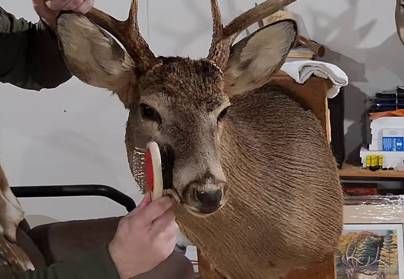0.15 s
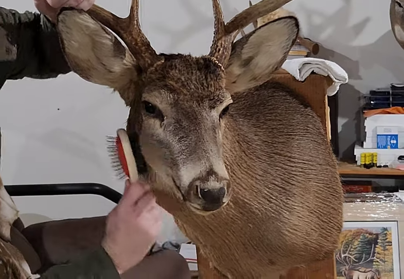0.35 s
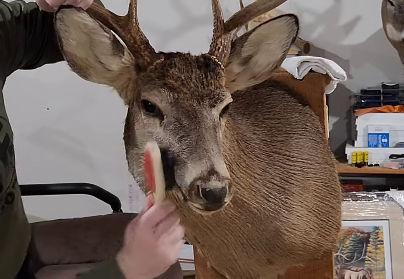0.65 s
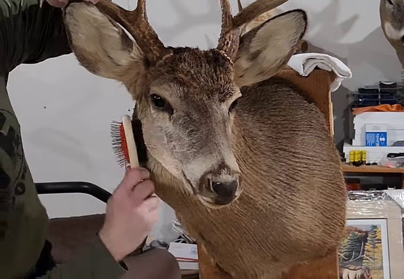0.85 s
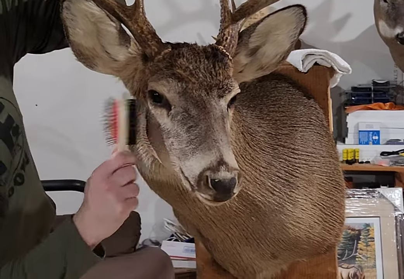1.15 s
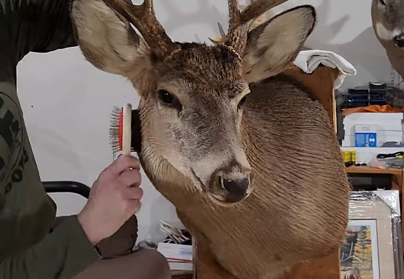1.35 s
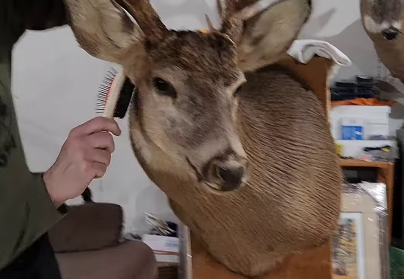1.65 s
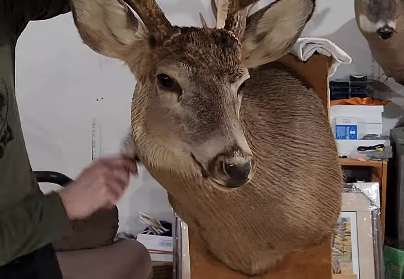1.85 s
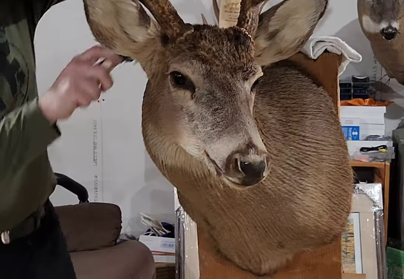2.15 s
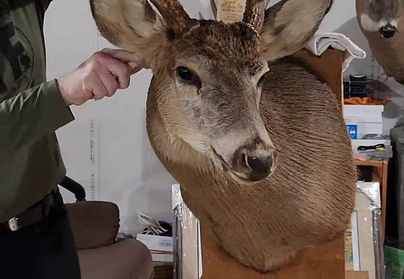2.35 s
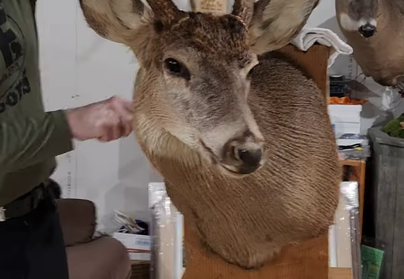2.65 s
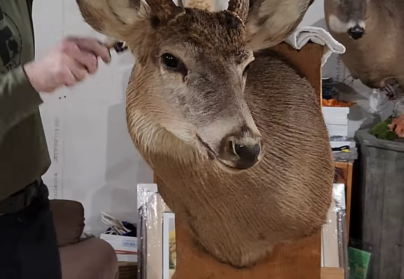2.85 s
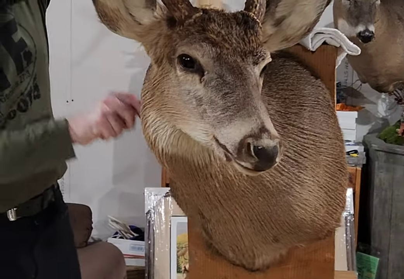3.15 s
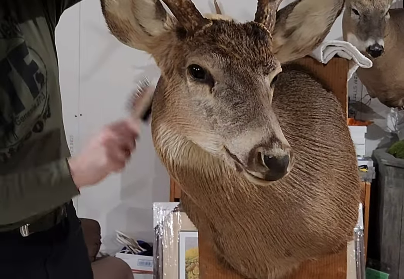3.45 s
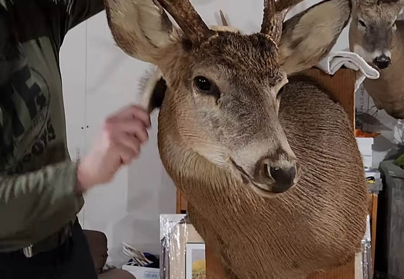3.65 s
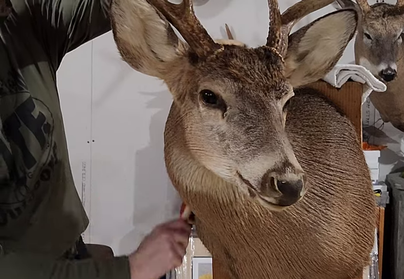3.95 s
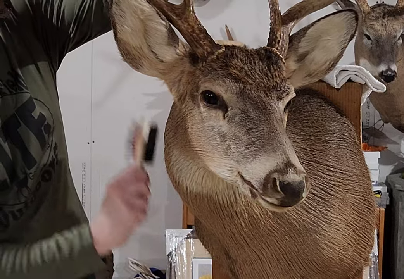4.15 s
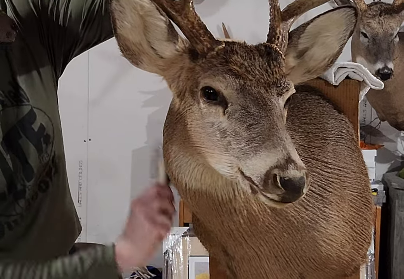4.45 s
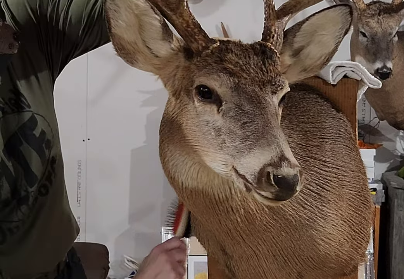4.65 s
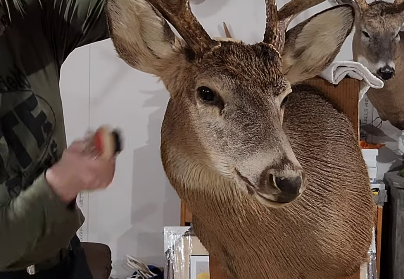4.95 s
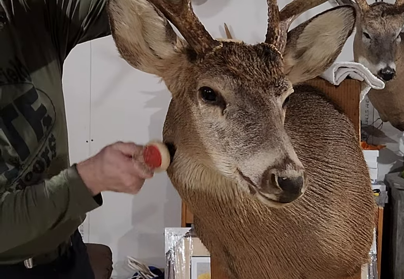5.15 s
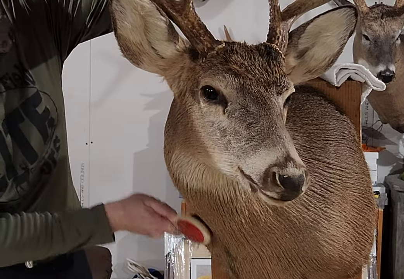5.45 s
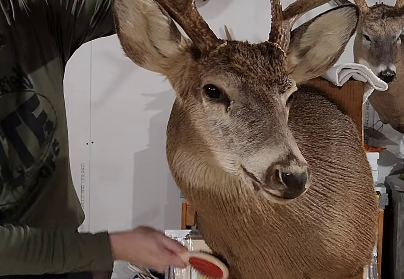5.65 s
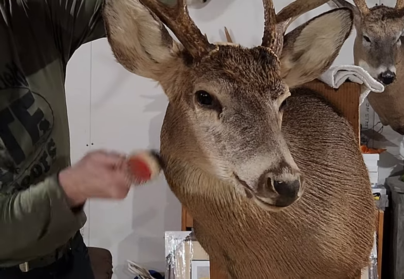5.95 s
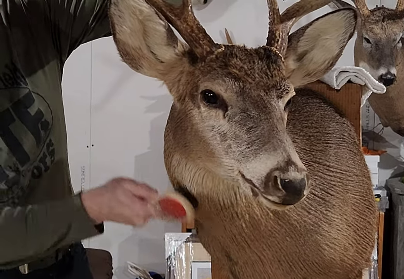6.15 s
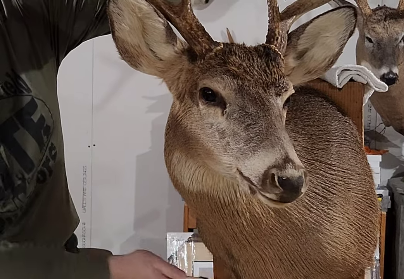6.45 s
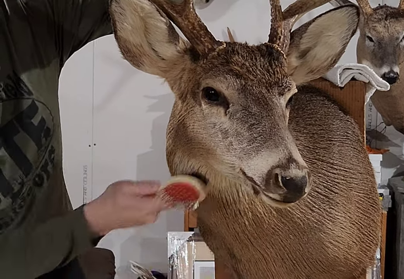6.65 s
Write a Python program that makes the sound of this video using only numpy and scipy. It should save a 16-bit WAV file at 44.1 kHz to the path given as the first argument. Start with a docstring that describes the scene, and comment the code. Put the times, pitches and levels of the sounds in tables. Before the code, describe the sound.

Stiff bristles rasp through the dry coat of a mounted deer head, heard closely in stereo. Brief scratchy strokes with bright hair hiss alternate with short gaps; the brush sometimes pats the hollow form with a muffled thump. One sharp knock of wood on wood, much louder than everything else, comes near the middle with a short dull tail. More strokes follow, some sinking in tone, over quiet humming indoor air.

```python
"""Brushing a mounted deer head

A wooden grooming brush, close to a two-port microphone in a small room, strokes the hair of the head.
Random bristle flicks, shaped stroke by stroke, make the rub, scrape and hiss; decaying modes make the
soft thumps of the hollow form and one hard clack on wood, with a small bounce and a dull noisy tail.
Behind them steady sine tones hum, two of them beating faintly, over dull, noisy room air."""
import sys
import numpy as np
from scipy import signal
from scipy.fft import rfft, irfft
from scipy.io import wavfile
from scipy.ndimage import uniform_filter1d

SR = 44100
rng = np.random.default_rng(int(sys.argv[2]) if len(sys.argv) > 2 else 0)


def pcm_store(signal):
    """Save signal as 16-bit PCM."""
    levels = np.round(np.clip(np.atleast_2d(signal), -1, 1) * 32767)
    wavfile.write(sys.argv[1], SR, levels.astype(np.int16).T)


N = 299439
T = np.arange(N) / SR  # time in seconds
FREQS = np.fft.rfftfreq(2 * N, 1 / SR)  # Hz

# Colour of the bristle shafts scraping over hair, heard close. Each row: frequency in Hz, level in dB.
SCRAPE_COLOUR = [(900, -6), (1800, -3.5), (2500, -6.5), (2950, 0), (3300, -2), (3600, -1), (4000, -2),
                 (4700, -1.5), (5600, -9), (7500, -24.5), (11000, -23.5)]
# Duller colour of the rubbed coat, also lent to the clack's tail. Each row: frequency in Hz, level in dB.
RUB_COLOUR = [(250, -24), (520, -9), (680, 0), (820, -1), (1000, -3), (1400, 0.5), (1800, -4), (2100, -1),
              (2500, -6.5), (4500, -30.5)]
# Bright hiss of the hair tips, heard close. Each row: frequency in Hz, level in dB.
TIPS_COLOUR = [(3500, -14.5), (6000, -3), (7600, -0.5), (9300, -4), (10700, -10.5), (12000, -1),
               (15500, -2.5)]


def brushing():
    """Each stroke rubs the coat, scrapes and hisses; the grip of the bristles wavers as they go."""
    scrape, rub, tips = stroking()
    grip = undb(0.97 * walk(45))
    coat = rub * flicks(RUB_COLOUR, rate=1700, scatter_db=1, width=1.06, pan_db=-0.75) * undb(0.62)
    shafts = scrape * flicks(SCRAPE_COLOUR, rate=5000, scatter_db=2, width=1.3, pan_db=-2.5) * undb(3.0)
    hiss = tips * flicks(TIPS_COLOUR, rate=10000, scatter_db=2.0, width=3.1, pan_db=4) * undb(4)
    return glance(grip * (coat + shafts + hiss), lag_s=.0022, share=0.86) + neck()


# Strokes of the brush through the coat. Each row: start in seconds, length in seconds, relative levels
# of scrape, rub and hair tips in dB, growth of pressure over the stroke in dB.
BRUSH_STROKES = [(-.1, .14, -56.5, -51.5, -63, 2.5), (0.012, 0.28, -63, -56, -69.5, 3),
                 (0.186, 0.25, -50.5, -55, -53.5, 5.5), (.44, 0.29, -74, -67, -80, 0),
                 (0.655, 0.21, -54, -55, -53, 3), (0.783, 0.21, -47, -49, -54, -3),
                 (1.217, .228, -47.5, -49, -53.5, 7), (1.7, 0.16, -49.5, -54.5, -55, 6),
                 (1.99, 0.3, -66, -56.5, -72, 19.5), (2.266, 0.42, -57.5, -54.5, -64, 13),
                 (2.962, 0.38, -56, -51, -63, 19), (3.653, 0.32, -54, -54, -60.5, 2),
                 (4.312, 0.34, -53.5, -54, -60, 1), (5.078, 0.43, -52.5, -51, -61, 0.5),
                 (5.497, 0.17, -56.5, -52.5, -61, 12), (6.03, 0.23, -51.5, -52.5, -56.5, 2),
                 (6.229, .17, -54.5, -49, -58.5, 12), (6.69, 0.26, -48, -56, -56, 5)]
# Faint rustle of coat and sleeve under the strokes. One row: relative levels of scrape, rub, tips in dB.
RUSTLE_LEVELS = (-80, -72, -84)
SINK_DB = 4.5  # the bristles sink into the coat as they travel, so its rub grows more over each stroke


def stroking():
    """Gains of scrape, rub and tips through all the strokes, added as powers over the rustle."""
    power = np.outer(undb(RUSTLE_LEVELS) ** 2, np.ones(N))
    for start, length, scrape_db, rub_db, tips_db, growth_db in BRUSH_STROKES:
        press = pressure(start, length, growth_db)
        sinking_press = pressure(start, length, growth_db + SINK_DB)
        power[0] += (undb(scrape_db) * press) ** 2
        power[1] += (undb(rub_db) * sinking_press) ** 2
        power[2] += (undb(tips_db) * press) ** 2
    return np.sqrt(power)


ATTACK_S, ARCH_DB, RELEASE_DB_PER_S = 0.081, 3, 258


def pressure(start, length, growth_db):
    """Gain of one stroke: a quick bite, an arched hold that grows or eases, and a release."""
    t = T - start
    way = np.clip(t / length, 0, 1)
    hold_db = growth_db * (way - .5) - ARCH_DB * (2 * way - 1) ** 2
    release_db = RELEASE_DB_PER_S * np.clip(t - length, 0, 1)
    bite = np.sin(np.pi / 2 * np.clip(t / ATTACK_S, 0, 1)) ** 2
    return bite * undb(hold_db - release_db)


def flicks(points, rate, scatter_db, width, pan_db):
    """Dense coloured clicks at random moments (rate per second), like bristles snapping past hairs."""
    happens = rng.random((3, N)) < rate / SR
    strength = rng.standard_normal((3, N)) * undb(scatter_db * rng.standard_normal((3, N)))
    return spread(colour(happens * strength, points), width, pan_db)


def glance(x, lag_s, share):
    """An echo off the deer's head, whose delay drifts at random so that the colour shifts."""
    late = [np.interp(T - lag_s * (1 + .2 * walk(3)), T, side) for side in x]
    return (x + share * np.array(late)) / np.sqrt(1 + share ** 2)


# Strokes down the neck that make the hollow form murmur. Each row: start in seconds, length in seconds,
# first centre in Hz, last centre in Hz, level in dB, growth in dB.
NECK_STROKES = [(5.3, 0.21, 1190, 1023, -52.5, 9), (5.62, .24, 690, 580, -59.5, 4),
                (6.23, .19, 740, 550, -61.5, 13)]


def neck():
    """Bristles dragging down the neck excite a broad resonance that sinks towards the chest."""
    lowpass = signal.butter(2, 210, fs=SR, output="sos")
    noise = rng.standard_normal((3, N)) + 1j * rng.standard_normal((3, N))
    drag = signal.sosfilt(lowpass, noise)
    out = 0
    for start, length, first_hz, last_hz, db, growth_db in NECK_STROKES:
        centre_hz = np.interp(T, [start, start + length], [first_hz, last_hz])
        # turning the complex noise moves its band up to the gliding centre
        turn = np.exp(2j * np.pi * np.cumsum(centre_hz) / SR)
        murmur = spread((drag * turn).real, width=0.33, pan_db=-1)
        out = out + undb(db) * pressure(start, length, growth_db) * murmur
    return out


# The brush landing on the head, close by; the row at 0.711 is the late low bloom of the landing at 0.692.
# Each row: time in seconds, thump level in dB, lowest note of the spot struck in Hz, soft pat level
# in dB, handle tick level in dB.
BRUSH_LANDINGS = [(0.692, -55, 165, -35, -26), (0.711, -40.5, 161, -60, -69), (1.212, -33, 174.6, -32, -43),
                  (2.18, -64, 149, -47, -43.5), (5.106, -36, 153.4, -36.5, -53),
                  (6.048, -48, 153, -43, -52.5)]
# Higher modes of the hollow form. Each row: frequency in Hz, level in dB, 60 dB decay time in seconds.
FORM_MODES = [(179, -5.5, 0.14), (227.6, 0, 0.14), (290.5, -2, 0.066), (393, -14, .14)]
# The brush's own tick. Each row: frequency in Hz, level in dB, 60 dB decay time in seconds.
HANDLE_MODES = [(1644, -11, 0.037), (2090, -4, 0.027), (2750, -2.5, 0.019), (3200, 0.5, 0.0095),
                (4600, -2, 0.0046)]
# Crack of a contact, in the landing pats and the clack. Each row: frequency in Hz, level in dB.
CRACK_COLOUR = [(40, -56.5), (150, -29), (380, -7), (750, -1.5), (1350, -6.5), (1900, -5.5), (2750, -14),
                (3500, -16.5), (4800, -18.5), (7000, -30), (15000, -48)]


def landings():
    """The brush meets the head: its handle ticks, the bristles pat and the hollow form thumps."""
    times, _, _, pat_db, tick_db = np.transpose(BRUSH_LANDINGS)
    thumps = 0
    for at, thump_db, lowest_hz, _, _ in BRUSH_LANDINGS:
        form = ring([(lowest_hz, -1, .22)] + list(FORM_MODES))
        thumps = thumps + convolve(blows([at], thump_db), form)
    taps = blows(times, tick_db)
    ticks = convolve(taps, ring(HANDLE_MODES)) + convolve(taps, burst(0.0015)) * undb(-10)
    pats = convolve(blows(times, pat_db), crack(CRACK_COLOUR))
    thumps_in_room = room(thumps, wet_db=-10, width=0.68, gap_s=0.01062)
    return thumps_in_room + room(ticks + pats, wet_db=-3.5, width=1.0, gap_s=0.0028)


# The clack on wood, a blow and its bounce. Each row: time in seconds, relative level in dB.
CLACK_BLOWS = [(3.3173, 0.5), (3.323, -13.5)]
# Ring of the struck wood. Each row: frequency in Hz, level in dB, 60 dB decay time in seconds.
WOOD_MODES = [(168, -21, .25), (270, -19, .2), (377, -8, .16), (406, -7, .2), (516, -12, .28),
              (657, -13.5, .62), (713, -2, .26), (787, -1, .24), (829, -3, .26), (893, -3, .33),
              (934, -1, .2), (1021, -2, .24), (1065, -3, .17), (1178, 0, .2), (1342, 4, .18),
              (1585, -2, .2), (1755, -3, .18), (1890, -1, .2), (2121, -8, .16), (2725, -3, .16)]


def clack():
    """Wood on wood: a crack, a hard quickly damped knock, and a ring that the room carries on."""
    hits = blows(*np.transpose(CLACK_BLOWS))
    first_blow = blows(*np.transpose(CLACK_BLOWS[:1]))
    snap = convolve(hits, crack(CRACK_COLOUR)) * undb(-12)
    # the contact builds up over a fraction of a millisecond
    knock_modes = [(790, -3.5, .016), (1367, 1.5, 0.021), (1940, -8.5, 0.0034)]  # Hz, dB, decay in s
    contact = 1 - np.exp(-T[:SR] / .0004)
    knock = convolve(hits, ring(knock_modes) * contact) * undb(-0.5)
    click = convolve(first_blow, burst(0.0017)) * undb(-29.5)
    # the ring builds up as the blow spreads through the wood
    spreading = 1 - np.exp(-T[:SR] / .005)
    rings = convolve(first_blow, ring(WOOD_MODES) * spreading) * undb(-21)
    snap_in_room = room(snap, wet_db=13.5, width=1.7, gap_s=.009)
    knock_in_room = room(knock + click, wet_db=-12.0, width=1.9, gap_s=0.01)
    return snap_in_room + knock_in_room + room(rings, wet_db=-11.5, width=4, gap_s=0.0053)


TAIL_DB, TAIL_RISE_S = -27, .015  # the rise time also sets the decay


def clack_tail():
    """The clack's diffuse tail: dull noise that swells briefly and dies away."""
    t = np.maximum(T - CLACK_BLOWS[0][0], 0) / TAIL_RISE_S
    tail_noise = flicks(RUB_COLOUR, rate=1900, scatter_db=0, width=0.63, pan_db=-4.2)
    return undb(TAIL_DB) * t * np.exp(1 - t) * tail_noise


# Appliance tones behind the brush. Each row: frequency in Hz, relative level in dB.
HUM_TONES = [(66, -67), (79, -73), (231.2, -54), (244.6, -60), (357.5, -70.5), (6471, -96.5)]
# Colour of the still room air. Each row: frequency in Hz, relative level in dB.
AIR_COLOUR = [(22, -18), (36, 2), (70, 1.5), (95, -1.5), (130, -2), (165, -10.5), (205, -4.5), (260, -8),
              (345, -11), (500, -19), (700, -17.5), (1050, -25), (2100, -24.5), (2800, -36), (3700, -31.5),
              (6000, -40), (10000, -62), (15000, -59.5)]
# How unlike the air is at the microphone's two ports. Each row: frequency in Hz, level in dB.
AIR_UNLIKENESS = [(10, -20), (170, 5.5), (450, 9), (1500, 9.5), (16000, 2.5)]
AIR_DB = -56


def background():
    """Motor tones beat against each other over dull room air, whose rumble is alike at both ports."""
    hum = 0
    for hz, db in HUM_TONES:
        phase = 2 * np.pi * (hz * T + rng.random()) + .18 * walk(2)
        hum = hum + np.sqrt(2) * undb(db) * np.sin(phase)
    # the hum sinks a little as the microphone moves round the head
    place_db = np.interp(T, [0, 1.2, 2.2, 6.8], [2.0, 1.4, -0.5, -1.0])
    noise = rng.standard_normal((3, N))
    noise[1:] = colour(noise[1:], AIR_UNLIKENESS)
    air = spread(colour(noise, AIR_COLOUR), width=1, pan_db=-0.5)
    return undb(place_db) * hum + undb(AIR_DB) * air


ROOM_T60_S, TREBLE_FADE_S = 0.27, 0.019


def room(x, wet_db, width, gap_s):
    """Direct sound, then after a gap the diffuse reflections, whose treble dies first."""
    tail = spread(reflections(ROOM_T60_S), width, pan_db=0.5)
    dull = signal.sosfilt(signal.butter(2, 3600, fs=SR, output="sos"), tail)
    treble = (tail - dull) * np.exp(-T[:SR // 2] / TREBLE_FADE_S)
    tail = unit(dull + treble) / np.sqrt(SR // 2)
    late_tail = np.pad(tail, ((0, 0), (int(gap_s * SR), 0)))
    return x + undb(wet_db) * convolve(x, late_tail)


def reflections(t60_s):
    """Three unrelated, evenly coloured showers of echoes that die away."""
    fade = np.exp(-np.log(1000) * T[:SR // 2] / t60_s)
    echoes = rng.standard_normal((3, len(fade))) * fade
    for _ in range(4):
        # flatten the spectrum, then restore the fade
        echoes = irfft(np.exp(1j * np.angle(rfft(echoes))), len(fade))
        local_power = np.abs(uniform_filter1d(echoes ** 2, size=700))
        echoes = echoes * fade / np.sqrt(local_power + 1e-18)
    return echoes


def blows(times, db):
    """One impulse for each contact."""
    out = np.zeros(N)
    np.add.at(out, (np.asarray(times) * SR).astype(int), undb(db))
    return out


def ring(modes):
    """Response of an object: decaying modes, neighbours swinging in opposite directions."""
    t = T[:SR]
    out = 0
    for k, (hz, db, t60) in enumerate(modes):
        out = out + (-1) ** k * undb(db - 60 * t / t60) * np.sin(2 * np.pi * hz * t)
    return out


def crack(points):
    """The short, causal pulse of a hard contact with the given spectrum, scaled to peak 1."""
    size = 1024
    cepstrum = irfft(np.log(undb(along(points, np.fft.rfftfreq(size, 1 / SR)))))
    # folding the cepstrum forward gives minimum phase: the energy comes as early as it can
    cepstrum[1:size // 2] *= 2
    cepstrum[size // 2 + 1:] = 0
    pulse = irfft(np.exp(rfft(cepstrum)))
    return pulse / np.abs(pulse).max()


def burst(decay_s):
    """The bright, quickly dying noise of a dry contact."""
    return rng.standard_normal(SR // 10) * np.exp(-T[:SR // 10] / decay_s)


def walk(rate):
    """Smooth random drift with a spread near 1, from `rate` random values a second."""
    k = int(SR / rate)
    steps = np.repeat(rng.standard_normal(N // k + 1), k)
    return 1.3 * uniform_filter1d(uniform_filter1d(steps, k), k)[:N]


def colour(x, points):
    """Give a sound the spectrum of (Hz, dB) points, falling away beyond the ends."""
    low_skirt = 1 / (1 + (points[0][0] / (FREQS + 1)) ** 4)
    high_skirt = 1 / (1 + (FREQS / points[-1][0]) ** 4)
    gain = undb(along(points, FREQS)) * np.sqrt(low_skirt * high_skirt)
    return irfft(rfft(x, 2 * N) * gain)[..., :N]


def spread(three, width, pan_db):
    """One shared and two separate signals make a stereo pair."""
    return unit(three[0] + width * three[1:]) * undb(np.array([[pan_db], [-pan_db]]) / 2)


def convolve(x, response):
    """Play a sound through a response for each channel."""
    return signal.fftconvolve(np.atleast_2d(x), np.atleast_2d(response), axes=-1)[:, :N]


def along(points, hz):
    """Read (Hz, value) points on a log-frequency axis."""
    f, value = np.transpose(points)
    return np.interp(np.log(hz + 1), np.log(f), value)


def unit(x):
    """Scale to rms 1."""
    return x / np.sqrt(np.mean(x ** 2))


def undb(db):
    """Decibels to gain."""
    return 10 ** (np.asarray(db) / 20)


def scene():
    """Brush, landings and clack in the humming room."""
    return brushing() + landings() + clack() + clack_tail() + background()


TOP_HZ = 15550


def record(dry):
    """The sound reaches the left port three samples before the right; peaks clip and the top is cut."""
    ports = np.array([dry[0], np.r_[0, 0, 0, dry[1, :-3]]])
    top_cut = signal.ellip(10, .2, 70, TOP_HZ, fs=SR, output="sos")
    return signal.sosfilt(top_cut, np.clip(ports, -1, 1))


dry = scene()
out = record(dry)
pcm_store(out)
```